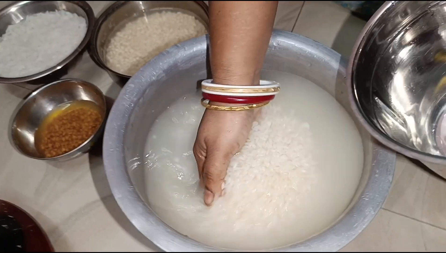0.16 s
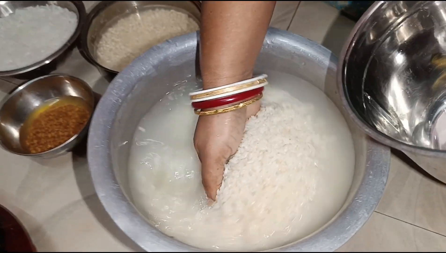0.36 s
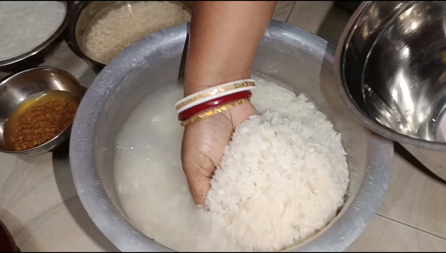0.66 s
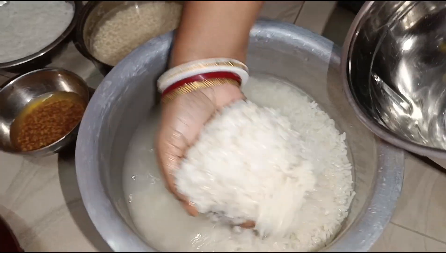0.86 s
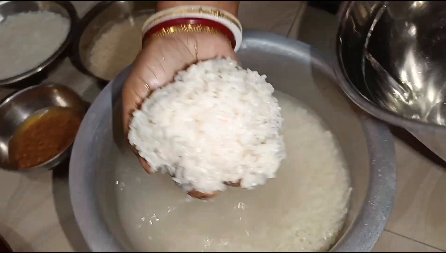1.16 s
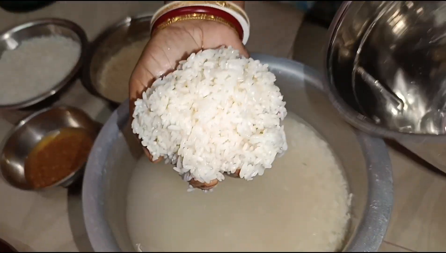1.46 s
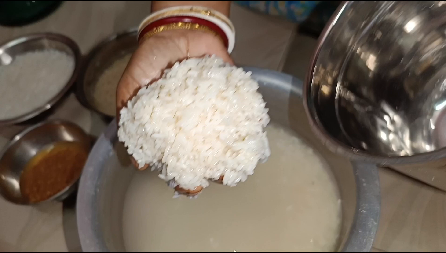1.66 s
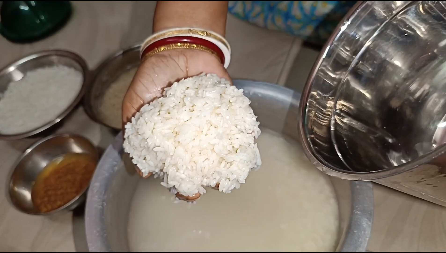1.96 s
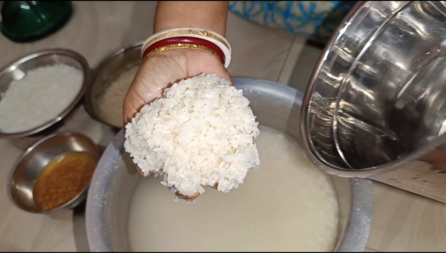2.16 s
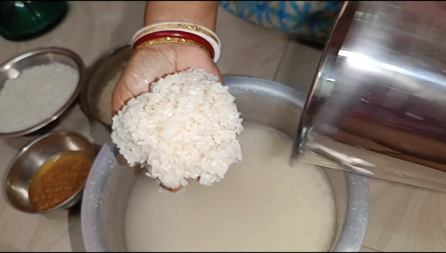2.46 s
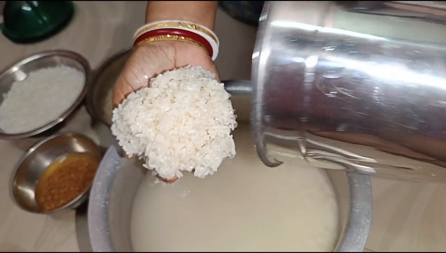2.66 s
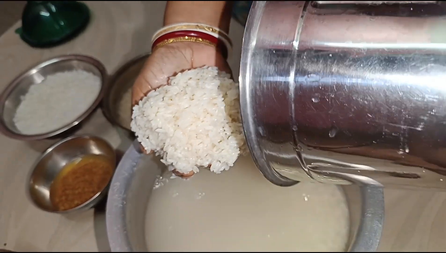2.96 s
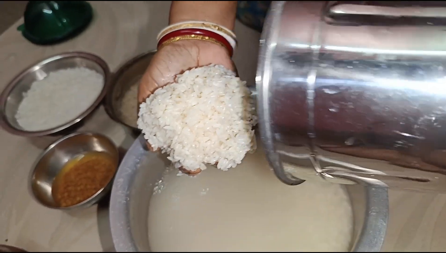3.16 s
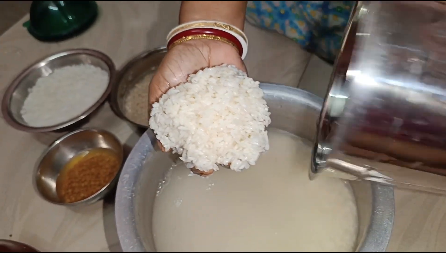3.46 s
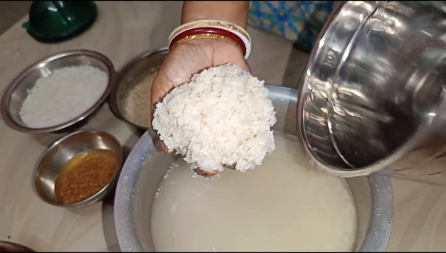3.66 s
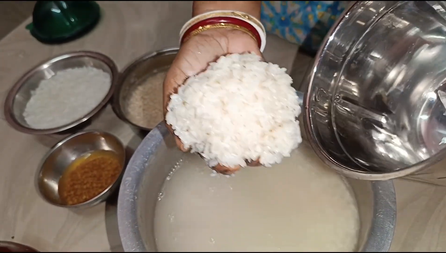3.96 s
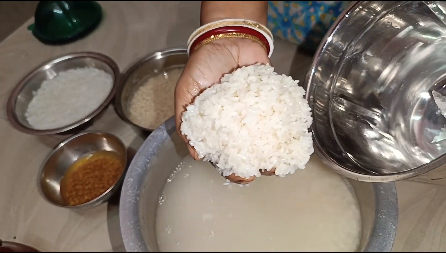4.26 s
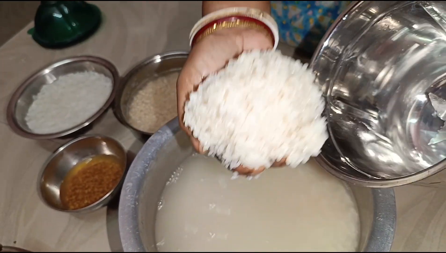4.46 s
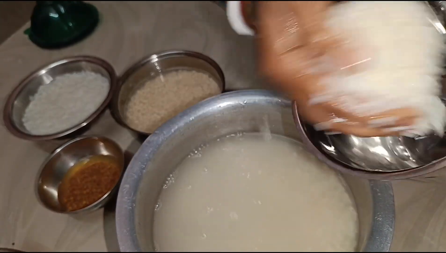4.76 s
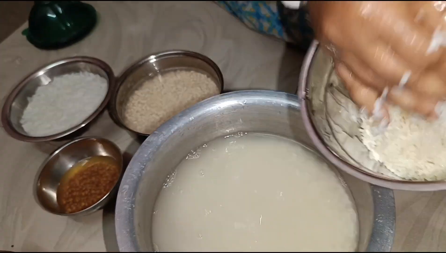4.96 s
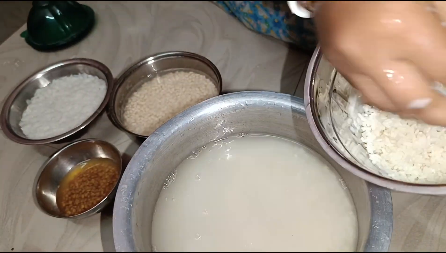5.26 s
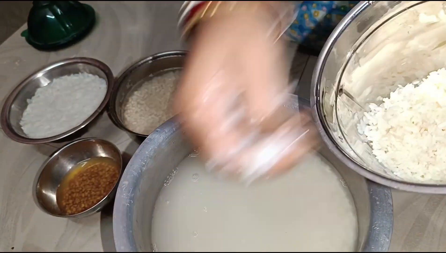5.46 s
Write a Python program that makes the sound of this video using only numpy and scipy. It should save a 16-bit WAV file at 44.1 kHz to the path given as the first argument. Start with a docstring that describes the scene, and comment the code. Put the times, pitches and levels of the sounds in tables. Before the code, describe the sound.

Near phone microphone, quiet room noise. First a low bump, watery swish and grainy hiss of rice under water. Then clustered drops plink with rising pitch in the bowl, loudest in the middle, growing sparse. A small knock on a hollow steel pot precedes a much louder clattering hail of wet rice, with brushing and a final dump.

```python
"""Fingers judder on the bottom of a metal bowl as a hand plunges in and stirs soaked rice under water.
The place is a kitchen, close to a phone's microphone; a handful comes out and water drips back in bursts.
Drops are damped rising sines with noise slaps in the bowl; moving water is patchy filtered noise.
An empty steel pot hums when handled, then takes the rice: a hail of noise through its resonances."""
import sys
import numpy as np
from scipy import signal
from scipy.fft import rfft, irfft, next_fast_len
from scipy.io import wavfile
from scipy.ndimage import uniform_filter1d

SR = 44100
rng = np.random.default_rng(int(sys.argv[2]) if len(sys.argv) > 2 else 0)


def wrap_up_sound(samples):
    """Save the sound to the file named by the first command line argument, as 16-bit audio."""
    columns = np.atleast_2d(samples).T
    # keep every value between -1 and 1, then stretch to whole-number steps
    tamed = np.clip(columns, -1, 1)
    steps = np.round(tamed * 32767).astype(np.int16)
    wavfile.write(sys.argv[1], SR, steps)


N = 247312  # samples

# All table levels are relative: the layers that play them add their own trims and filters.


def amp(db):
    """Gain of a level in dB."""
    return 10 ** (np.asarray(db) / 20)


def unit(x):
    """x scaled to an RMS of one."""
    return x / np.sqrt(np.mean(x ** 2) + 1e-20)


def curves(rows):
    """One gain per sample for each dB column, practically silent outside the rows."""
    s, *cols = np.transpose(rows)
    return [amp(np.interp(np.arange(N) / SR, s, c, -140, -140)) for c in cols]


def spells(rows, rise_s, stop_s, sag_db):
    """One gain per sample for each dB column: every row rises, sags by sag_db per second, then stops."""
    t, out = np.arange(N) / SR, 0
    for s, length, *db in rows:
        rising = (t - s) / max(rise_s, 1 / SR)
        stopping = 1 + (s + length - t) / max(stop_s, 1 / SR)
        edge = np.clip(np.minimum(rising, stopping), 0, 1) ** 2
        sag = np.outer(sag_db, np.clip(t - s, 0, 1))
        out = out + edge * amp(np.array(db)[:, None] - sag)
    return out


def filtered(x, response):
    """x passed through a response given as a function of frequency."""
    m = next_fast_len(N + SR // 2)
    return irfft(rfft(x, m) * response(np.fft.rfftfreq(m, 1 / SR)), m)[:N]


def shape(points):
    """Gain through (frequency [Hz], level [dB]) points on a log axis."""
    f, db = np.transpose(points)
    return lambda hz: amp(np.interp(np.log(hz + 1), np.log(f + 1), db, -120, -120))


def peaks(modes):
    """Causal response of (centre [Hz], width [Hz], level [dB]) resonances with alternating signs."""
    def response(f):
        total = 0
        for k, (centre, width, db) in enumerate(modes):
            total = total + (-1) ** k * amp(db) * 1j * f * width / (centre ** 2 - f * f + 1j * f * width)
        return total
    return response


def steep_peaks(modes):
    """The resonances applied twice, for steeper skirts."""
    return lambda f: peaks(modes)(f) ** 2


def cavity(modes):
    """The air in the bowl resonates and passes little outside its first modes."""
    return lambda f: peaks(modes)(f) * (1j * f / (1050 + 1j * f)) ** 4 / (1 + 1j * f / 4500) ** 4


def noise():
    """Steady white noise."""
    return rng.standard_normal(N)


def patchy(depth_db, grain_db, size=12, order=8):
    """White noise with patches of random gain in time and frequency, and quick grains of level."""
    z = signal.stft(noise(), nperseg=2 ** order)[2]
    across_hz = uniform_filter1d(rng.standard_normal(z.shape), size=2, axis=0)
    field = uniform_filter1d(across_hz, size=size, axis=1)
    x = signal.istft(z * amp(depth_db * unit(field)), nperseg=2 ** order)[1][:N]
    return x * amp(grain_db * unit(uniform_filter1d(noise(), size=130)))


def add(track, s, sound):
    """Mix a sound in at time s."""
    part = track[round(s * SR):][:len(sound)]
    part += sound[:len(part)]


def bubble(hz, t60, rise, attack):
    """A damped sine whose pitch climbs as the bubble nears the surface."""
    t = np.arange(SR // 8) / SR
    swing = np.sin(2 * np.pi * hz * (t + rise * t * t / t60))
    return swing * amp(-60 * t / t60) * (1 - np.exp(-t / attack)) ** 2


def puff(t60, attack):
    """A burst of noise with a soft onset and a steady dB decay."""
    t = np.arange(SR // 8) / SR
    return rng.standard_normal(len(t)) * amp(-60 * t / t60) * (1 - np.exp(-t / attack))


def kitchen(x, t60):
    """The near walls answer with a short noisy tail."""
    t = np.arange(SR // 3) / SR
    tail = rng.standard_normal(len(t)) * amp(-60 * t / t60) * (t > .004)
    return signal.fftconvolve(x, tail / np.linalg.norm(tail))[:len(x)]


# Spectrum of the room's steady noise: (frequency [Hz], level [dB])
ROOM_SPECTRUM = [(12, -22), (48, -8), (123, 7.5), (1000, -10.5), (1290, -21.5), (2080, -12.5), (2530, -16),
                 (4810, -15.5), (6180, -19), (16000, -33)]
ROOM_DB = -76.5


def room():
    """The kitchen's steady noise behind everything, slightly uneven."""
    return amp(ROOM_DB) * unit(filtered(patchy(depth_db=1.5, grain_db=1.4), shape(ROOM_SPECTRUM)))


# Handling hum of the pot's wall: (start [s], length [s], first mode [dB], second mode [dB])
HUM = [(0, 0.054, -51.5, -61.5), (2.02, 0.226, -84, -48), (2.104, 0.16, -56, -61), (2.4, .1, -87, -48),
       (2.674, 0.09, -56, -78.5), (3.017, 0.071, -78, -50), (4.422, 0.055, -49, -49.5)]
HUM_RISE_S, HUM_STOP_S = 0.012, 0.04
# Sag of the hum: (first mode [dB/s], second mode [dB/s])
HUM_SAG = (40.5, 125.5)
# Modes of the empty steel pot: (frequency [Hz], level [dB], t60 before extra damping [s]);
# the first two hum and use the frequency only
POT_MODES = [(394.5, 0, 0.21), (806, -7, 0.26), (1230, 1, 0.29), (1840, -9.5, 0.12), (2480, -14.5, 1.2),
             (3400, -12, 0.17), (5450, -11, 0.19), (6140, -6, 0.13)]
# A knock on the empty pot: (start [s], length [s], level [dB])
KNOCK = (4.428, 0.077, -44.5)
KNOCK_RISE_S, KNOCK_STOP_S, KNOCK_SAG = 0.0063, .008, 251  # sag in dB/s


def pot():
    """The empty pot's two lowest modes hum unsteadily; a knock shakes the higher ones."""
    hum = np.zeros(N)
    for gain, (hz, _, _) in zip(spells(HUM, HUM_RISE_S, HUM_STOP_S, HUM_SAG), POT_MODES):
        wall = unit(filtered(noise(), steep_peaks([(hz, hz / 9, 0)])))
        hum += filtered(gain * wall, peaks([(hz, 200, 0)]))
    # each width follows from the mode's decay, plus 25 Hz of damping
    upper = [(hz, 25 + np.log(1000) / (np.pi * t60), db) for hz, db, t60 in POT_MODES[2:]]
    upper.append((3415, 4200, -32.0))
    knock = spells([KNOCK], KNOCK_RISE_S, KNOCK_STOP_S, KNOCK_SAG)[0]
    return hum + knock * unit(filtered(noise(), peaks(upper)))


# Fingers judder on the bowl's bottom: (time [s], throb [dB], chatter [dB])
RUB = [(0, -47, -90), (.08, -72, -90), (.14, -65, -71), (.18, -61, -54), (.23, -60, -57), (.27, -66, -68)]
RUB_HZ = 74.4  # slips per second


def rub():
    """Stick and slip at a steady rate: a low throb, and each slip clicks in the bowl."""
    throb, chatter = curves(RUB)
    t = np.arange(N) / SR
    cycle = (RUB_HZ * t) % 1
    clicks = noise() * amp(-35 * cycle)  # loudest as each slip begins
    slips = filtered(clicks, steep_peaks([(1750, 500, 0), (2500, 500, -2.5)]))
    rumble = unit(filtered(noise(), peaks([(91.7, 23, 0)])))
    low = 0.92 * np.sin(2 * np.pi * RUB_HZ * t) + 0.62 * rumble
    return throb * unit(low) + chatter * unit(slips) * amp(1.0)


# The hand plunges: (time [s], level [dB])
PLUNGE = [(0, -39), (.05, -44), (.13, -67), (.3, -68.5), (.55, -76), (.62, -97)]


def slosh():
    """Water pushed aside by the plunging hand: broad, slowly patchy noise."""
    body = peaks([(1050, 500, -6), (2100, 1000, 0), (4500, 1500, -19)])
    return curves(PLUNGE)[0] * unit(filtered(patchy(depth_db=4, grain_db=3, size=36), body))


# A pocket of air under the hand: (start [s], length [s], level [dB])
AIR_POCKET = (.43, 0.081, -67.5)
GLUG_HZ = 699


def glug():
    """A pocket of air glugs under the hand: noise in one narrow band."""
    gain = spells([AIR_POCKET], 0.037, 0.036, 3)[0]
    return gain * unit(filtered(noise(), steep_peaks([(GLUG_HZ, 60, 0)])))


# Rice poured into the pot: (start [s], length [s], clatter [dB], rattle [dB])
POURS = [(5.09, 0.027, -43, -41), (5.108, .17, -20, -15.5), (5.425, .2, -26, -26.5)]
POUR_RISE_S, POUR_STOP_S = .022, 0.026
# Sag of a pour: (clatter [dB/s], rattle [dB/s])
POUR_SAG = (105, 160)
# Fingers brush off the last grains: (start [s], length [s], clatter [dB], rattle [dB])
BRUSH = (5.28, 0.32, -29.5, -44)
# Clumps of rice striking: (time [s], clatter [dB], rattle over the clatter [dB])
CLUMPS = [(5.0892, -37.5, 3.5), (5.1454, -11, -7), (5.1639, -4, -9), (5.2308, -20, 3.5), (5.283, -7.5, -8),
          (5.4295, -9.5, -5.5), (5.451, -3.5, -2), (5.5019, -11, -9.5), (5.5355, -13, -13.5),
          (5.5872, -11, -3)]
# Spectra of the strikes, low and high: (frequency [Hz], level [dB])
CLATTER = [(410, -27), (700, -13), (1060, -14), (1600, -4.5), (1800, -6.5), (2430, -4.5), (4500, -13.5),
           (5850, -34), (9900, -120)]
RATTLE = [(2350, -28.5), (4000, -17.5), (4650, -13), (6180, -0.5), (7840, -15), (9660, -9), (10700, -15.5),
          (13400, -14), (16000, -28)]
# Resonances of the pot under falling rice: (centre [Hz], width [Hz], level [dB])
FILLING = [(1770, 30, -8), (2390, 25, 6), (3100, 120, -11), (3320, 50, -9), (3950, 28, -14),
           (5150, 35, -10), (5640, 55, -9), (5990, 25, -3), (6270, 150, -10), (6750, 45, -9),
           (7240, 40, -12)]
# The same pot while the hand rests on it: (centre [Hz], width [Hz], level [dB])
HELD = [(1550, 90, -3), (2330, 100, -4), (2920, 35, 0), (3520, 47, -5), (5540, 80, -9)]
# Low modes of the pot, one list empty and one with rice in it: (centre [Hz], width [Hz], level [dB])
LOW_MODES = [
    [(420, 140, 0.5), (625, 51, 2.5)],
    [(299, 110, -4), (457, 89, -4.5)],
]
# Low boom: (time [s], level [dB])
BOOMING = [(5.08, -73), (5.094, -49), (5.152, -34), (5.186, -34), (5.27, -63.5), (5.288, -40),
           (5.362, -33.5), (5.444, -39.5), (5.462, -36), (5.6, -72)]
BUMP_S, LOADED_S = 5.466, 5.27  # the hand bumps the pot; the boom changes to the pot with rice


def rice():
    """A hail of wet grains and some clumps strike the steel, which rings briefly and booms."""
    clatter, rattle = spells(POURS, POUR_RISE_S, POUR_STOP_S, POUR_SAG)
    brushed, shed = spells([BRUSH], POUR_RISE_S, POUR_STOP_S, (16, 5))
    steel = peaks(FILLING)
    ringing = lambda f: shape(CLATTER)(f) + amp(6.5) * steel(f)
    rattling = lambda f: shape(RATTLE)(f) + amp(3.5) * steel(f)
    damped = lambda f: shape(CLATTER)(f) + amp(6.5) * peaks(HELD)(f)

    hail = patchy(depth_db=2.5, grain_db=2.5)
    ticks = hail * amp(3 * unit(uniform_filter1d(noise(), size=24)))  # single grains stand out
    bed = clatter * unit(filtered(ticks, ringing))
    bed += (rattle + shed) * unit(filtered(ticks, rattling))
    bed += brushed * unit(filtered(hail, damped))

    low, high, bump = np.zeros((3, N))
    for s, db, rattle_db in CLUMPS:
        add(low, s, amp(db + 11) * puff(0.03, attack=0.003))
        add(high, s, amp(db + rattle_db + 10) * puff(0.036, attack=0.0017))
    strikes = filtered(low, ringing) + filtered(high, shape(RATTLE))

    empty, loaded = (unit(filtered(hail, steep_peaks(modes))) for modes in LOW_MODES)
    thud = curves(BOOMING)[0] * np.where(np.arange(N) < LOADED_S * SR, empty, loaded)
    add(thud, BUMP_S - .012, amp(-43) * bubble(80, .07, rise=0, attack=.004))
    add(bump, BUMP_S, amp(3.5) * puff(.028, attack=.0003))
    return bed + thud + strikes + filtered(bump, steep_peaks([(1400, 2000, 0)]))


# The hand in the rice: (time [s], swish [dB], hiss [dB], spray [dB])
STIRRING = [(0, -59, -56.5, -80), (.12, -52.5, -55.5, -68.5), (.5, -59, -52.5, -74.5),
            (.8, -69.5, -55, -82), (.87, -52, -55, -75), (1.09, -55.5, -56.5, -66),
            (1.26, -51.5, -55.5, -71.5)]
# Water runs off in spells: (start [s], length [s], gurgle [dB], hiss [dB], spray [dB])
TRICKLES = [(1.725, .318, -42.5, -50.5, -58), (2.048, .22, -57.5, -65, -68.5), (2.413, .13, -47, -53, -77),
            (2.55, 0.45, -49, -53, -58), (2.95, .19, -54.5, -61.5, -89.5), (3.565, .1, -50, -58.5, -80),
            (3.67, .185, -60, -54, -81), (3.861, .17, -77, -67.5, -94.5)]
TRICKLE_RISE_S, TRICKLE_STOP_S = 0.01, 0.0052
# Sag of trickles and drains: (gurgle [dB/s], hiss [dB/s], spray [dB/s])
RUNOFF_SAG = (15.5, 13.5, 23)
# The moving handful drains: (start [s], length [s], gurgle [dB], hiss [dB], spray [dB])
DRAINS = [(4.76, 0.11, -82.5, -51.5, -57), (4.93, 0.148, -75, -58, -64.5)]
DRAIN_RISE_S, DRAIN_STOP_S = 0.098, 0.066
# Steady seeping under it all: (gurgle [dB], hiss [dB], spray [dB])
SEEP = (-83, -76, -91.5)
# Fine bubbles swirl behind the fingers: (start [s], length [s], level [dB])
SWIRLS = [(.16, 0.17, -61), (.34, .16, -62), (.97, .28, -63.5)]
# Spectrum of rice grains sliding under water: (frequency [Hz], level [dB])
SLIDING_GRAINS = [(900, -50), (1250, -24), (1600, -26), (1850, -5), (2250, 0), (2600, -5), (2900, -27),
                  (3300, -20), (3700, -40)]
# Spectra of hiss and of spray, the latter also thrown by drips: (frequency [Hz], level [dB])
HISS = [(2060, -39.5), (3500, -40), (5250, -26), (6480, 12), (6800, 1), (7620, -42), (8000, -39),
        (10400, -53.5), (17600, -120)]
SPRAY = [(4120, -27), (7000, -8), (9890, 6), (11600, -2), (13600, 7), (16000, -2.5)]
# Air over the water in the bowl, also struck by drips: (centre [Hz], width [Hz], level [dB])
BOWL_AIR = [(1380, 450, 1), (2019, 160, 13), (2710, 450, 4), (3262, 165, 4.5)]


def patter():
    """Trickling water: 900 scattered small bubbles, and noise in the bowl's air."""
    bubbles = np.zeros(N)
    for s, pitch, size in rng.random((900, 3)):
        hz = 1100 * amp(8.5 * pitch ** 1.5)
        add(bubbles, s * N / SR, amp(-18 * size) * bubble(hz, 0.03, rise=0.18, attack=0.002))
    air = filtered(patchy(depth_db=4, grain_db=3.5), cavity(BOWL_AIR))
    return unit(unit(bubbles) + .7 * unit(air))


def wash():
    """Stirring hisses through sliding rice; once the hand is out, trickles patter in the bowl."""
    trickling = spells(TRICKLES, TRICKLE_RISE_S, TRICKLE_STOP_S, RUNOFF_SAG)
    running = trickling + spells(DRAINS, DRAIN_RISE_S, DRAIN_STOP_S, RUNOFF_SAG)
    gurgle, hiss, spray = curves(STIRRING) + running + amp(SEEP)[:, None]

    # narrow streaks that come and go, crossfading to the patter from 1.15 s
    stir = unit(filtered(patchy(depth_db=7.5, grain_db=1.5, size=8, order=10), shape(SLIDING_GRAINS)))
    lifted = np.clip((np.arange(N) / SR - 1.15) / 0.2, 0, 1)
    water = gurgle * ((1 - lifted) * stir + lifted * patter())

    high = hiss * unit(filtered(patchy(depth_db=4.0, grain_db=2.0, order=9), shape(HISS)))
    top = spray * unit(filtered(patchy(depth_db=4, grain_db=3), shape(SPRAY)))

    # fine bubbles swirl, and burst with the spray of the trickles
    fizz_gain = trickling[2] * amp(4.5) + spells(SWIRLS, 0.037, 0.036, 3)[0] * amp(-3)
    fine = patchy(depth_db=7, grain_db=2.5, size=9, order=10)
    fizz = fizz_gain * unit(filtered(fine, steep_peaks([(4600, 1300, 0)])))
    return water + high + top + fizz


# Bubbles that swell while rising fast: (time [s], level [dB], from [Hz], to [Hz], length [s])
CHIRPS = [(1.997, -32.5, 1370, 1970, 0.021), (2.676, -38, 2460, 3240, 0.015),
          (3.624, -38, 1680, 2430, 0.011), (1.852, -32, 1500, 2500, 0.01), (1.928, -28, 2250, 2500, 0.014),
          (3.565, -30, 2300, 2900, 0.014), (3.573, -21, 1850, 2150, 0.024), (3.59, -22, 1440, 1560, 0.03),
          (3.593, -36, 2500, 3200, 0.014), (4.652, -49, 950, 1500, 0.017),
          (4.395, -44.5, 1674, 2300, 0.024)]


def chirps():
    """A bubble breaking the surface sweeps up in pitch."""
    out = np.zeros(N)
    for s, db, from_hz, to_hz, length in CHIRPS:
        u = np.arange(round(length * SR)) / (length * SR)
        cycles = length * (from_hz * u + (to_hz - from_hz) * u * u / 2)
        add(out, s, amp(db) * np.sin(np.pi * u) * np.sin(2 * np.pi * cycles))
    return out


# Drops: (time [s], bubble [dB], starting pitch [Hz], then over the bubble: bright slap [dB],
# splash [dB], spray [dB])
DRIPS = [(0.686, -29, 2194, -7, -23.5, -38), (1.039, -47.5, 2330, -5, 0, 11.5),
         (1.115, -29.5, 1660, -1.5, -38, -25), (1.132, -40, 2700, -1, 4, -6),
         (1.165, -39.5, 1980, -21, 0, -2), (1.175, -32.5, 1790, -4, -7, -16),
         (1.206, -39, 2370, 8, 11.5, -10), (1.226, -45, 2330, -2, 5.5, -6),
         (1.34, -63.5, 2350, 11, 9.5, 10), (1.38, -24, 2135, -20, -22.5, -29),
         (1.438, -49.5, 1730, 5.5, -12, -18), (1.47, -56, 1600, 13.5, -6, -19),
         (1.552, -52, 1300, 10.5, -11, -19), (1.646, -26.5, 1310, -14, -32, -37),
         (1.721, -24, 1420, -9, -22, -22.5), (1.733, -21.5, 1393, 4.5, -22, -23.5),
         (1.753, -16, 2120, 6.5, -11.5, -10), (1.766, -15.5, 1280, -2, -11.5, -27),
         (1.798, -16, 1210, -15, -15, -20.5), (1.816, -22.5, 1030, 7, -9.5, -21),
         (1.854, -23.5, 1350, 8.5, -6.5, -12), (1.885, -18, 1330, 2.5, -19, -21.5),
         (1.924, -18, 2250, -5, -38, -47), (1.954, -18.5, 1855, 3, -15.5, -22.5),
         (1.975, -22, 1390, -13, -12.5, -16), (1.996, -19, 1346, -2, -15, -16),
         (2.016, -24.5, 856, 7, -10, -26), (2.031, -34.5, 880, -10, 7, -4.5),
         (2.072, -34, 2030, 1, -21, -23.5), (2.09, -30, 2440, -1.5, -20, -21),
         (2.113, -31.5, 1920, -0.5, -10.5, -23.5), (2.141, -35.5, 1670, -1, -21, -36),
         (2.153, -32.5, 850, -0.5, -20, -20), (2.255, -63, 2700, 6, 2, 13.5),
         (2.294, -44, 1820, -6, -30, -5), (2.341, -42.5, 1230, -19, -26, -31),
         (2.412, -21.5, 2006, -9, -15, -31), (2.481, -31, 1208, -7, -18, -31.5),
         (2.549, -24.5, 1192, 2.5, -3, -10.5), (2.586, -15, 1200, -6.5, -18.5, -15.5),
         (2.627, -21.5, 1360, -27, -5, -14), (2.67, -3, 1295, -4.5, -27, -35.5),
         (2.765, -11.5, 1317, 3.5, -19.5, -31), (2.835, -14, 3330, -2, -12.5, -12),
         (2.905, -26.5, 1285, -3, -36, -25), (2.918, -15.5, 1242, -1.5, -26, -27.5),
         (2.966, -29, 1990, -4, -31, -35), (3.02, -22, 1888, 6, -42.5, -57),
         (3.036, -29, 907, -3, -38, -42), (3.122, -39.5, 2020, 5.5, -3.5, -13.5),
         (3.134, -33, 1980, 2.5, -15.5, -51), (3.268, -38, 2290, -6, -24, -15),
         (3.316, -38.5, 3320, -6.5, -24, -32), (3.372, -40.5, 2073, -2.5, -24, -16),
         (3.409, -41, 1260, -1, -26, -22), (3.429, -30.5, 2060, -14.5, -31, -39.5),
         (3.541, -42.5, 1184, 2, -35, -41.5), (3.561, -12, 1215, -5.5, -57, -43),
         (3.707, -32.5, 2090, 8.5, -16, -19.5), (3.717, -15, 1950, -4.5, -31.5, -28.5),
         (3.81, -30, 2040, 10, -18.5, -50), (3.816, -15, 1436, 2.5, -19, -49.5),
         (3.957, -25.5, 1337, -15.5, -30.5, -24.5), (4.02, -43, 2000, 5.5, -2, -20.5),
         (4.077, -48.5, 1534, 7, -1.5, -20.5), (4.203, -63.5, 780, -10.5, 13, 23.5),
         (4.218, -24.5, 1946, -12, -20.5, -41.5), (4.292, -54, 1400, 0, -8.5, -14),
         (4.38, -67.5, 1940, -3, 13, 22), (4.399, -37.5, 1930, -24.5, 1, -9),
         (4.547, -33.5, 3170, -17, -14, -24.5), (4.61, -49.5, 3220, -1, -6, -8),
         (4.649, -40, 1080, 1, -21.5, -13.5)]
# Small bubbles that ping beside the drops: (time [s], level [dB], starting pitch [Hz])
PINGS = [(1.734, -27, 2600), (1.79, -32, 3200), (1.819, -22, 3150), (1.843, -28, 6300), (1.86, -31, 4050),
         (1.878, -31, 5100), (1.955, -26, 4200), (2.0, -32, 5600), (2.616, -34, 6300), (2.628, -26, 5300),
         (2.671, -12, 2060), (2.766, -17, 2640), (2.835, -22, 1990), (3.021, -24, 2580), (4.22, -42, 3300)]
# The ringing tails break off here: (time [s])
HUSHED = [1.259, 2.042, 3.14, 3.854, 4.03]
# Tiny droplets spit at random: count, loudest level [dB], first and last possible time [s]
SPITS, SPIT_DB, SPIT_SPAN_S = 60, -44, (1.27, 5.05)


def drips():
    """Each drop traps a bubble, slaps the air in the bowl and throws spray."""
    bubbles, deep, bright, splash, spray = np.zeros((5, N))
    for (s, db, hz, bright_db, splash_db, spray_db), chance in zip(DRIPS, rng.random(len(DRIPS))):
        t60 = 34 / hz  # bubbles live for a set number of cycles
        add(bubbles, s, amp(db + 5.5) * bubble(hz, t60, rise=0.14 * chance, attack=0.0012))
        add(deep, s, amp(db - 4.5) * puff(0.031, attack=.0005) * (hz < 1500))  # low-pitched drops only
        add(bright, s, amp(db + bright_db + 6) * puff(0.027, attack=0.00061))
        add(splash, s, amp(db + splash_db + 6.0) * puff(0.02, attack=0.0016))
        add(spray, s, amp(db + spray_db + 5) * puff(0.013, attack=0.00058))
    for s, db, hz in PINGS:
        add(bubbles, s, amp(db + 6.5) * bubble(hz, .015, rise=.05, attack=.0009))
    for when, size in rng.random((SPITS, 2)):
        s = np.interp(when, (0, 1), SPIT_SPAN_S)
        add(spray, s, amp(SPIT_DB - 22 * size) * puff(.012, attack=0.00055))

    small = lambda f: (1j * f / (600 + 1j * f)) ** 3  # small bubbles radiate no bass
    splash_modes = [(5946, 750, 12.5), (4540, 330, -19.0), (3200, 300, -12)]
    wet = filtered(bubbles + chirps(), small)
    wet += filtered(deep, cavity(BOWL_AIR[:1])) + filtered(bright, cavity(BOWL_AIR[1:]))
    wet += filtered(splash, peaks(splash_modes)) + filtered(spray, shape(SPRAY))

    edges = np.round(np.array([0, *HUSHED, N / SR]) * SR).astype(int)
    tails = [kitchen(wet[a:b], t60=0.19) for a, b in zip(edges, edges[1:])]
    return wet + amp(-9.0) * filtered(np.concatenate(tails), small)


def scene():
    """All layers in the kitchen, from the background to the drops in the bowl."""
    hand = rub() + slosh() + glug()
    return (room() + pot() + hand + rice() + wash() + drips())[None]


TOP_HZ = 15750


def record(dry):
    """The phone's microphone keeps nothing above its band limit."""
    return filtered(dry[0], lambda hz: hz < TOP_HZ)[None]


dry = scene()
out = record(dry)
wrap_up_sound(out)
```